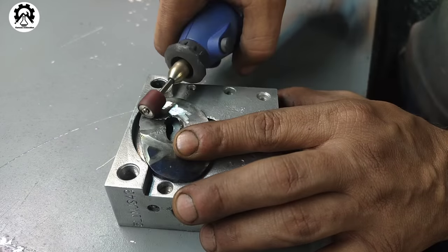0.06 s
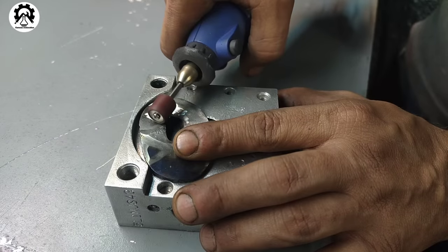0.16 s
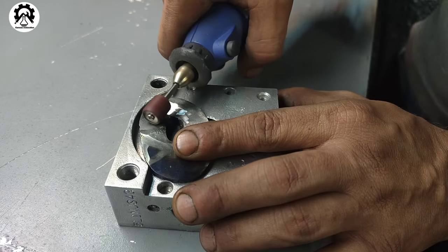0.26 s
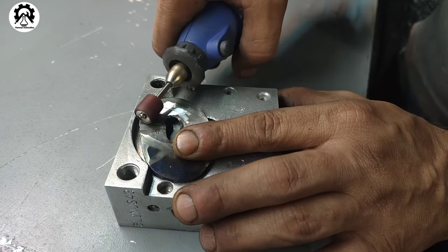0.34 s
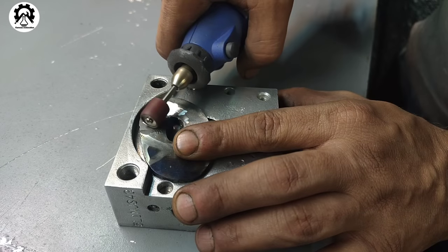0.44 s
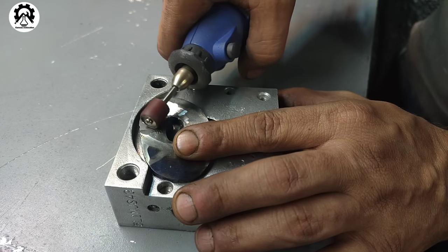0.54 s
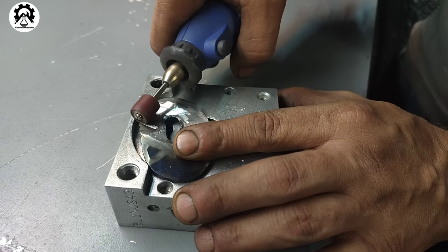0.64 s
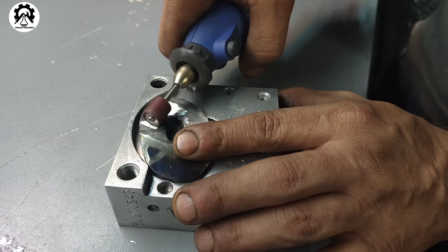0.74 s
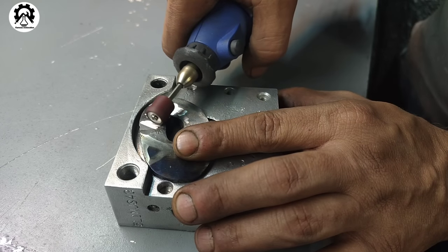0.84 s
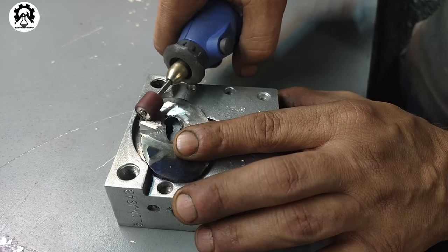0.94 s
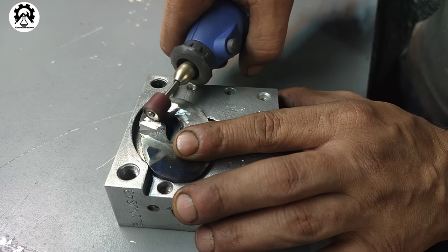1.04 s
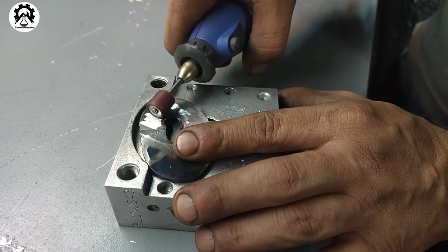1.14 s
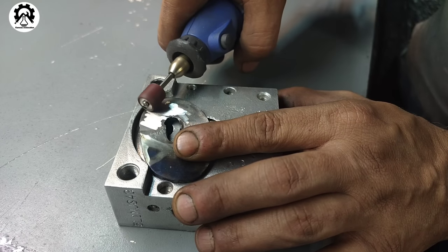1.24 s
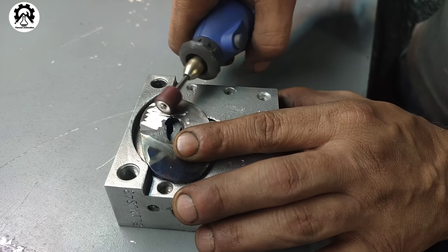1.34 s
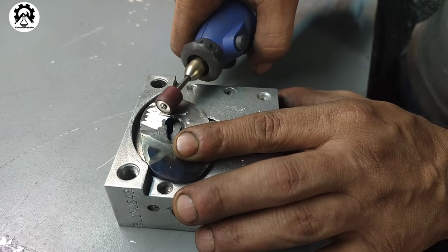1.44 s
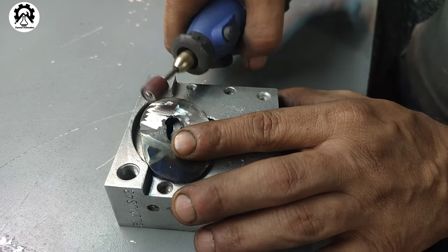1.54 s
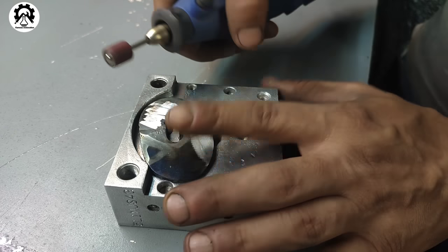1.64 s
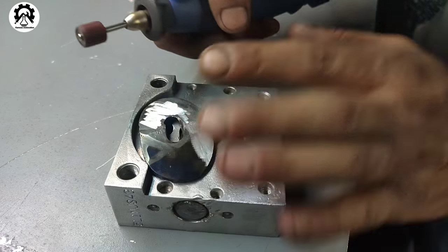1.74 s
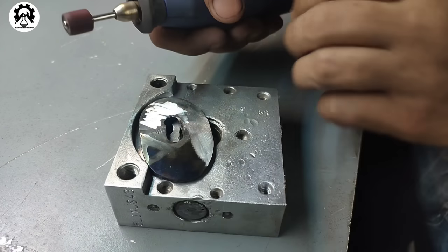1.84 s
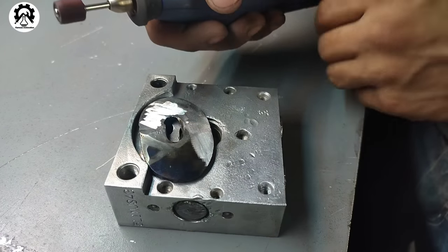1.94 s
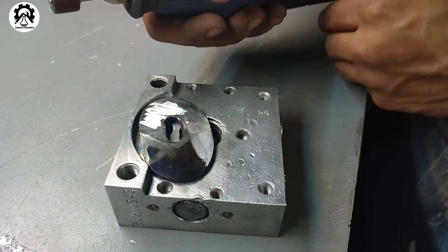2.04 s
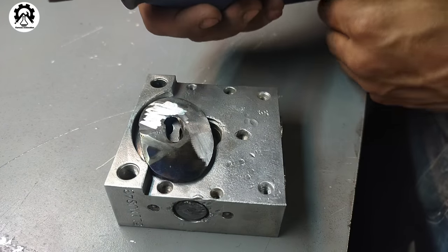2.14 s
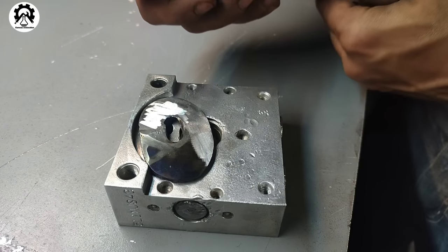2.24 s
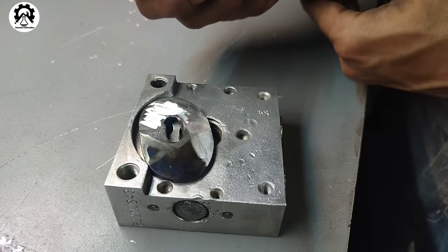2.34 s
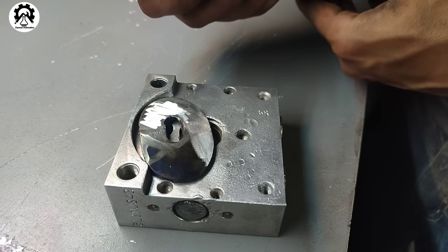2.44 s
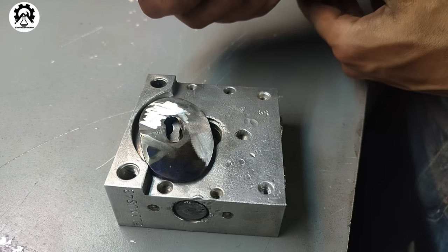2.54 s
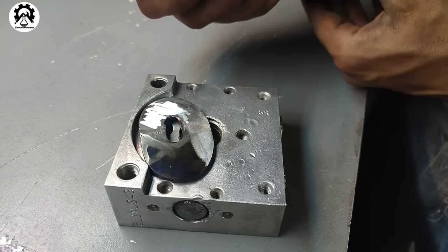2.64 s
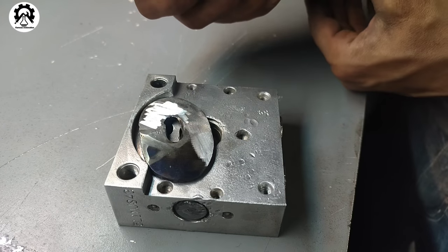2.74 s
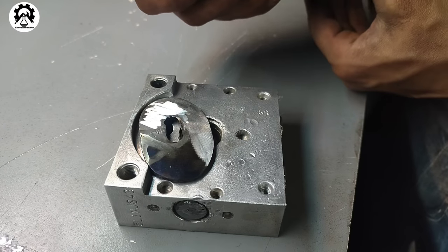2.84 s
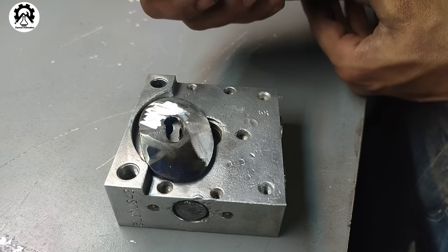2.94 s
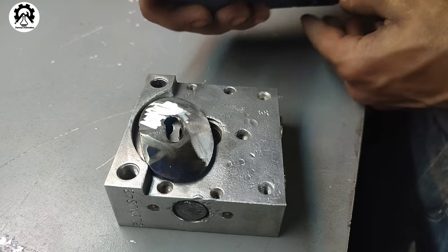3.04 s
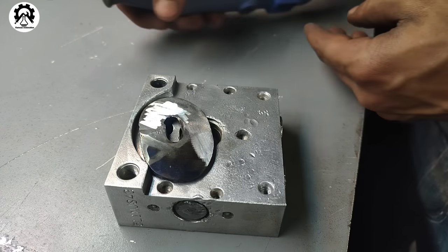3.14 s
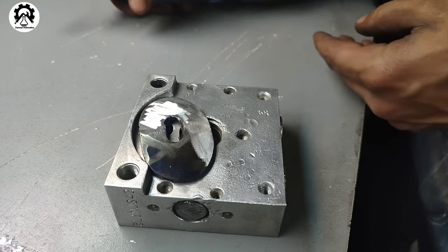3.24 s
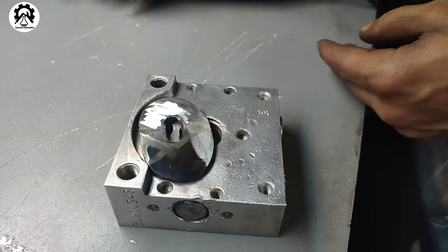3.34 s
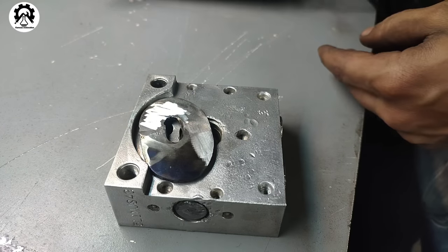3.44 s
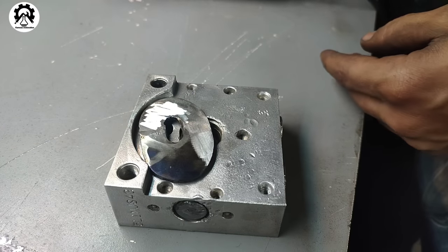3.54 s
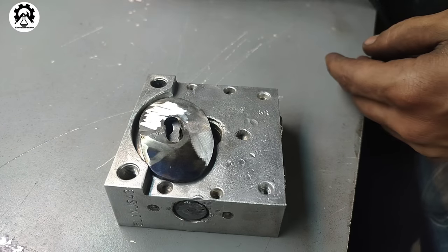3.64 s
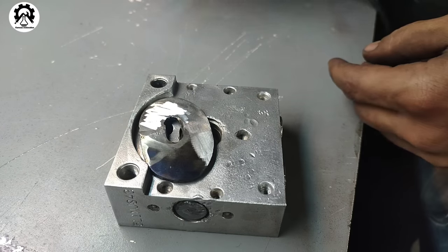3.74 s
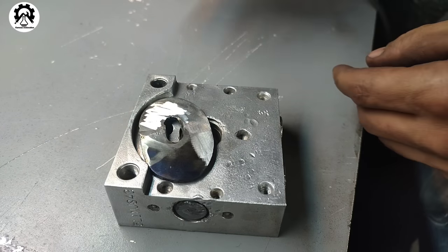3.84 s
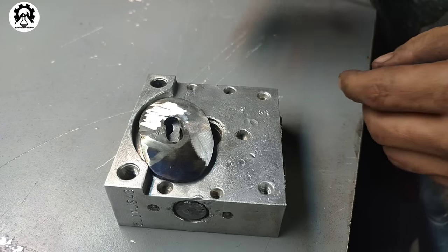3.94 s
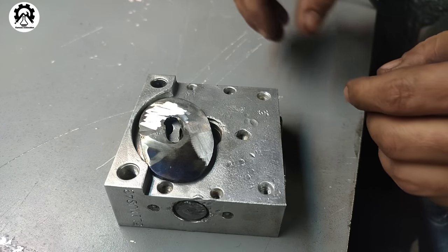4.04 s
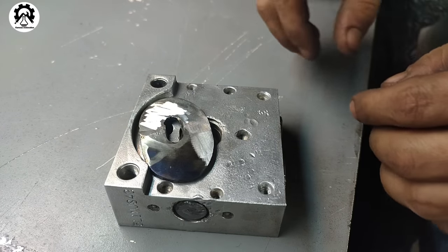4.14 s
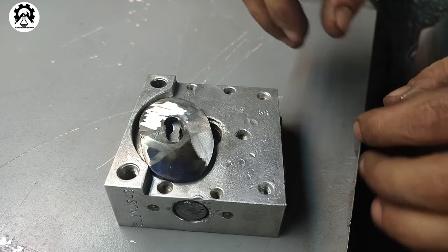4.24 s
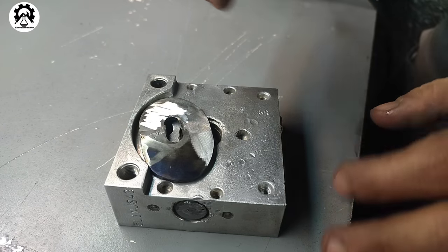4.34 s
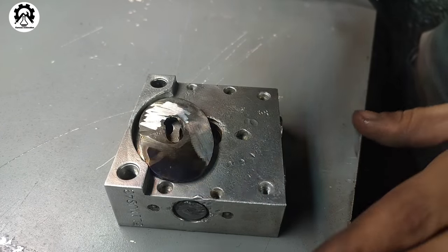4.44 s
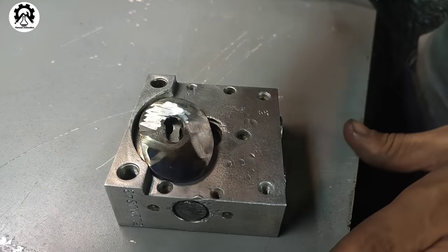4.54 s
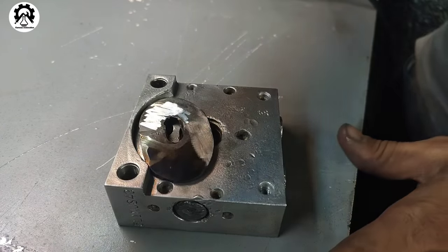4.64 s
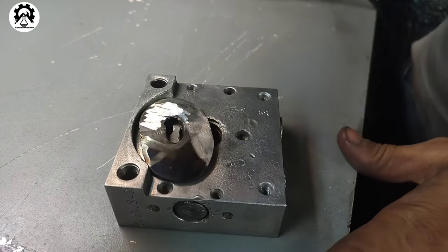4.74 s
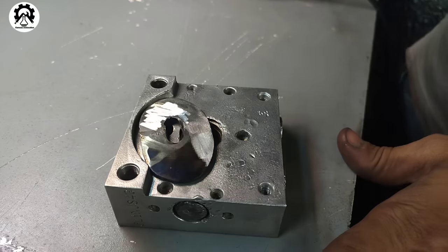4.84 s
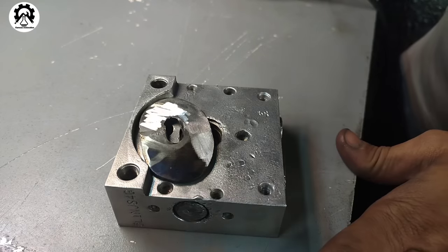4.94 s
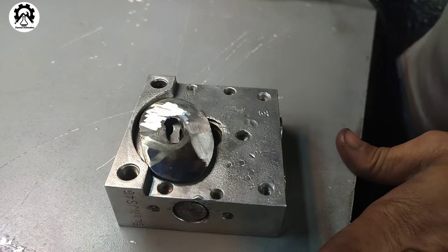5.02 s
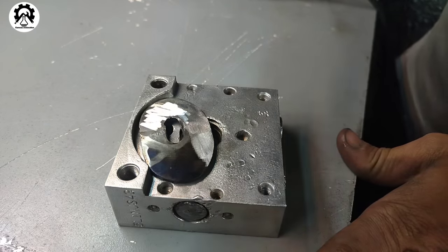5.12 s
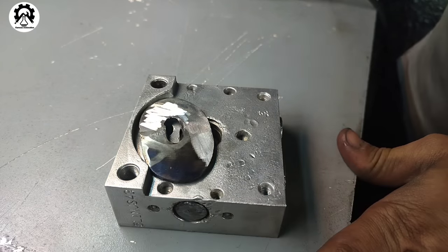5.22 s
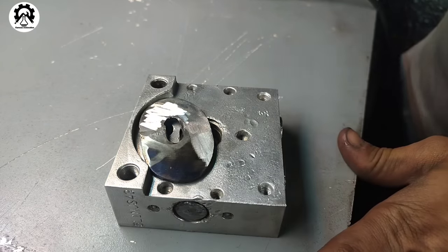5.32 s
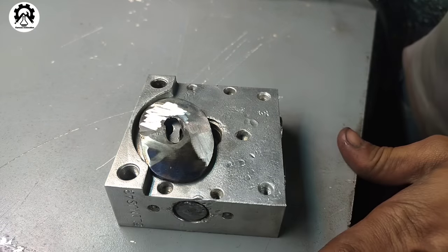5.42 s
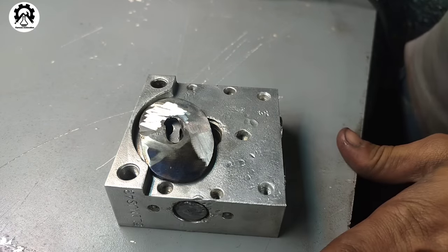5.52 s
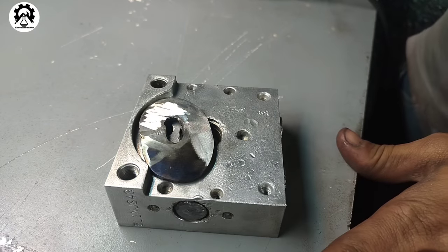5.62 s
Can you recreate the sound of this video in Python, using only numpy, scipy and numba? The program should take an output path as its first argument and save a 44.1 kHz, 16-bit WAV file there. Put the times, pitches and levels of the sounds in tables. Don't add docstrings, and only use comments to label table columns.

```python
import sys
import numpy as np
from scipy import signal
from scipy.fft import rfft, irfft
from scipy.io import wavfile
from scipy.ndimage import uniform_filter1d, map_coordinates
from numba import njit

SR = 44100
rng = np.random.default_rng(int(sys.argv[2]) if len(sys.argv) > 2 else 0)


def ratio(d):
    e = np.asarray(d, float) / 20
    return 10 ** e


def wav_record(signal):
    frames = np.transpose(np.atleast_2d(signal))
    bounded = np.clip(frames, -1, 1)
    quanta = np.round(bounded * 32767).astype(np.int16)
    wavfile.write(sys.argv[1], SR, quanta)


N = 250488
T = np.arange(N) / SR
LIFT_S, SWITCH_OFF_S, LAID_DOWN_S, STILL_S = 1.77, 2.972, 3.62, 4.65
CAGE = .388
MAINS_HZ = 100
FRAMES = dict(fs=SR, nperseg=1024, noverlap=768)

# time_s, turns_per_s
LOADED_SPEED = [
    (0.0, 250.6),
    (0.17, 248.4),
    (0.95, 249.3),
    (1.3, 248.6),
    (1.45, 242.9),
    (1.62, 239.2),
    (1.77, 238.0),
]
# time_s, turns_per_s
COAST_SPEED = [
    (2.975, 294.2),
    (3.15, 262.6),
    (3.3, 234),
    (3.6, 180.3),
    (4.0, 110.8),
    (4.3, 63.6),
    (4.7, 8.0),
]


def shaft_speed():
    free_turns, lift_turns, spin_up_s = 315.4, 240.3, .945
    free = free_turns - (free_turns - lift_turns) * np.exp(-(T - LIFT_S) / spin_up_s)
    loaded, coasting = curves(LOADED_SPEED)[0], curves(COAST_SPEED)[0]
    return np.select([T < LIFT_S, T < COAST_SPEED[0][0]], [loaded, free], coasting)


# time_s, level_db, left_right_db
HISS_LEVEL = [(0.0, -30.5, -1.5), (0.09, -34, 0), (1.1, -33, -0.5), (1.76, -34.5, -0.5), (1.84, -35.5, -1),
              (2.09, -35.5, 1), (2.7, -35.5, -1.5), (2.91, -33.5, 1.5), (3.65, -35.5, -0.5),
              (3.97, -37, -1.5), (4.38, -46.5, 1), (4.5, -60.5, 1.5), (4.6, -81, 4), (4.65, -102, 2)]
# time_s, state
TOOL_STATE = [(0, 0), (1.72, 0), (1.84, 1), (2.95, 1), (3.05, 2), (3.24, 2), (3.4, 3), (3.6, 3), (4.0, 4),
              (4.4, 5), (4.58, 6)]
# frequency_hz, level_db_per_hz
FAST_COLOURS = [
    [(90, -26.5), (300, -34.5), (637, -25.5), (976, -14.5), (1450, -11), (2460, -7.5), (2950, -14),
     (3230, -6.5), (3800, -8.5), (5460, -18.5), (7300, -4), (8730, -11.5), (10200, -12), (14000, -9.5)],
    [(90, -36.5), (300, -32), (602, -25.5), (1100, 0), (1880, -8.5), (2350, 1), (3010, -7.5), (4390, -6.5),
     (5950, -8), (7580, -4), (9230, -4.5), (10300, -8), (13500, -4.5), (14300, -19.5)],
    [(90, -42), (350, -37.5), (854, -13), (1100, 1), (1410, -7), (1640, -8), (2060, -10.5), (2390, -6),
     (3950, -3.5), (5680, -7), (7930, -2.5), (10400, -6.5), (13700, -5), (14300, -14)],
]
# frequency_hz, level_db_per_hz
TURNED_COLOUR = [(150, -47.5), (300, -34), (600, -31.5), (900, -16), (1290, -12.5), (1560, -1),
                 (1910, -14.5), (2380, -8.5), (3200, -11.5), (4000, -4), (5640, -8.5), (7910, -4.5),
                 (10400, -12), (14300, -5)]
# frequency_hz, level_db_per_hz
SLOW_COLOURS = [
    [(530, -71), (900, -43.5), (1220, -20), (1640, -15), (1910, -24), (2450, -8), (2900, -8), (3610, -12),
     (4010, -7), (5510, -9.5), (7320, -5), (13800, -23), (14500, -8.5), (15000, -46.5)],
    [(350, -62), (600, -36), (899, -39), (1130, -6.5), (1240, -14), (1650, -11), (2070, -16), (2600, 0),
     (5390, -9), (6690, -2.5), (10500, -22), (12300, -24), (14400, -35), (15000, -71)],
    [(500, -40), (1070, -6.5), (1900, -15), (2350, -3), (2600, 9), (2900, -4), (5590, -15), (7230, -9),
     (10000, -30), (13000, -36)],
]
# time_s, level_db
FAN_ROAR = [(1.74, 0), (1.79, -5), (1.95, -2.5), (2.3, 0), (2.6, 0.5), (3.1, 0.5), (3.3, -3)]


def tool(turns, speed):
    level_db, pan_db = curves(HISS_LEVEL)
    powered = T < SWITCH_OFF_S
    beat = 1 + 0.058 * np.cos(2 * np.pi * turns)
    beat += 0.056 * powered * np.cos(2 * np.pi * MAINS_HZ * T)
    hz, t, hiss = signal.stft(pair() * beat, **FRAMES)
    lines = signal.stft(bearing_lines(turns, speed), **FRAMES)[2]
    row = hz[:, None]

    ridges = evened(uniform_filter1d(rng.standard_normal((400, len(t))), 28, 1))
    place = row / (CAGE * 1.2 * np.maximum(np.interp(t, T, speed), 45))
    forest = map_coordinates(ridges, [place, np.arange(len(t)) + 0 * place], order=1, mode="wrap")
    bright = np.clip(row / 1500, 0, 1) ** 2
    forest_depth = np.interp(t, [2.9, 3.3, 3.7, 4.0], [0.96, 0.81, 1.1, .65])
    hiss = hiss * ratio((5.13 * forest - 2.0) * bright * forest_depth)

    treble = (hz > 3000) & (hz < 14000)
    shapes = np.array([read(c, hz) for c in FAST_COLOURS + [TURNED_COLOUR] + SLOW_COLOURS])
    shapes -= 10 * np.log10((ratio(shapes) ** 2 * treble).mean(1))[:, None]
    distance = abs(curves(TOOL_STATE, t)[0] - np.arange(len(shapes))[:, None])
    colour_db = shapes.T @ np.maximum(1 - distance, 0)
    patches = uniform_filter1d(rng.standard_normal(hiss.shape), 10, 1)
    patches = evened(uniform_filter1d(patches, 30, 2))
    z = (hiss + lines) * ratio(colour_db + 2.08 * patches * bright)

    below_top = 1 + (row / 1470) ** 6
    above_bottom = 1 + (650 / (row + 1)) ** 4
    z *= ratio(curves(FAN_ROAR, t)[0] / below_top / above_bottom)
    x = signal.istft(z, **FRAMES)[1][:, :N]
    return panned(x * ratio(level_db + 1.04) * (T < STILL_S), pan_db) + switch_snap()


def switch_snap():
    after = np.maximum(T - SWITCH_OFF_S, 0)
    return ratio(-33 - 60 * after / 0.027) * (after > 0) * rng.standard_normal((2, N))


# grinding_db, free_db, coasting_db
SHAFT_LINES = [(29, 7.5, -7), (19, -3.5, -20.5), (11.5, -18.5, -9), (13, -16, -8.5), (11.5, 6.5, -17.5),
               (16, -6, -24.5), (16, 3.5, -20.5), (6, 10, 7), (-17.5, 4.5, -13), (7.5, -7, -14.5),
               (-12.5, -9, -14), (17.5, 5, 2), (-18.5, 9.5, -16.5), (9, 4, -27), (-2.5, -4, -2.5),
               (-4, -19.5, -3.5), (-9.5, -2, -12.5), (5.5, 9.5, -12.5), (2.5, 8.5, -6), (1, -7, -8),
               (-15.5, -8.5, -17), (8.5, -24, -22.5)]
PASS_ORDERS = [(1, 0), (1, 1), (2, 1), (3, -1), (3, 0), (3, 1), (4, -1), (4, 0), (4, 1), (5, -1), (5, 0),
               (5, 1), (6, 1), (7, -1), (7, 0), (7, 1), (8, 0), (12, 5), (9, -1), (9, 0), (9, 1), (10, 1),
               (11, 1), (2, 0), (6, 0), (9, -2), (10, 0), (11, 0)]
# grinding_db, free_db, coasting_db
PASS_LINES = [(5.5, 8, 5), (6.5, -10.5, -3), (-12, -6.5, -3), (6.5, 10.5, 0), (5, 8, 6), (9, 13.5, 5),
              (9, 12, 4), (6, 11, 9), (2, 12, 7), (-0.5, 10, 5), (15, 8, 4), (12, 6, 4), (7, 11, -1),
              (5, 1, 2), (1.5, 3.5, 4), (11, 4, -2), (7, 13.5, 4), (5, 9, 4), (17, 4, -1), (14.5, 13, 9.5),
              (-8, 3, 1), (-3, 3, -3), (-4.5, 4.5, -12), (-15, -5, 7), (-15, -5, 3), (-15, -10, 2),
              (3, -10, 5), (-15, 7, 3)]
# grinding_db, free_db, coasting_db
SPIN_LINES = [(-19.5, 4.5, -8.5), (-1, -8, -20), (-12.5, 10.5, 5), (-18.5, -12, -15), (-5, 11, -3.5),
              (13.5, -4, -14), (11, 0.5, 10), (13.5, 1, -2), (1, 3.5, -17.5), (3.5, 13.5, -14.5),
              (-5, -1.5, -9), (4, -2, -7), (4, 0.5, 16.5), (3.5, -6.5, -7), (-6, -6, -9.5),
              (-2.5, 9.5, 0.5), (0.5, -4, -22.5), (-0.5, 4, -16), (-6.5, -7, -21.5), (-12.5, -5.5, -7)]


def bearing_lines(turns, speed):
    ball_pass, ball_spin = 3.888, 2.68
    orders = [k + 1 for k in range(len(SHAFT_LINES))]
    orders += [ball_pass * k + CAGE * side for k, side in PASS_ORDERS]
    orders += [ball_spin * (k + 1) for k in range(len(SPIN_LINES))]
    orders = np.array(orders)
    step = 512
    at = np.minimum(np.arange(N // step + 2) * step, N - 1)
    t = T[at]
    chance = rng.standard_normal((len(orders), 2, len(at), 2))
    waver = evened(uniform_filter1d(chance[..., 0], 6, 2))
    slip = evened(uniform_filter1d(chance[..., 1], 5, 2))

    state = curves(TOOL_STATE, t)[0]
    heights = np.add(SHAFT_LINES + PASS_LINES + SPIN_LINES, [.1, -1.5, 1.5])
    level_db = []
    for order, (grinding, free, coasting) in zip(orders, heights):
        slow = coasting + (-12 if int(order > 17) else 2)
        blurred = coasting - 5
        stages = [grinding, free, blurred, coasting - 1.5, slow, slow, coasting]
        level_db.append(np.interp(state, [0, 1, 2, 3, 4, 4.7, 5], stages))
    level_db = np.array(level_db)
    level_db[0] += np.interp(t, [1.48, 1.58, 1.75], [0, -9, -3])
    turning = evened(uniform_filter1d(chance[:, 0, :, 0], 18, 1))
    level_db += 2.5 * np.minimum(turning, 1) * (t > LIFT_S)

    heard = (orders[:, None] * speed[at] < SR / 2.5) & (t < STILL_S)
    waver_db = np.where(t < LIFT_S, 2.4, 3.65) * np.minimum(waver, 1.3)
    hiss_in_line = np.sqrt(2 * 32 / (SR / 2))
    gain = hiss_in_line * ratio(level_db[:, None] + waver_db) * heard[:, None]
    phase = 0.0067 * orders[:, None, None] * slip[:, :1]
    phase = phase + 1.12 * np.clip(orders / 3.3, .35, 1)[:, None, None] * slip
    return sing(turns, orders, gain, phase, step)


@njit
def sing(turns, orders, gain, phase, step):
    out = np.zeros((2, len(turns)))
    for k in range(len(orders)):
        for c in range(2):
            for n in range(len(turns)):
                j, u = n // step, n % step / step
                g = gain[k, c, j] * (1 - u) + gain[k, c, j + 1] * u
                if g > 0:
                    p = phase[k, c, j] * (1 - u) + phase[k, c, j + 1] * u
                    out[c, n] += g * np.sin(2 * np.pi * orders[k] * turns[n] + p)
    return out


# time_s, level_db
WHINE_LEVEL = [(0.0, -48), (1.2, -47), (1.45, -44), (1.76, -58), (1.9, -39.5), (2.05, -37.5), (2.2, -31),
               (2.39, -26), (2.61, -30), (2.77, -27), (2.96, -33)]
# frequency_hz, width_hz, level_db
CASING_MODES = [(2414, 410, 1.5), (2460, 69, -14.5), (1980, 220, -22)]
# time_s, pitch_ratio
GRIP_SHIFT = [(1.85, 0.96), (2.15, 0.94), (2.4, 0.986), (2.95, 0.999)]


def whine(turns):
    slots = 8
    level_db = curves(WHINE_LEVEL)[0] + 2.5 * drift(1, 4.34) * (T < LIFT_S)
    cycle = (MAINS_HZ * T - .1) % 1
    current = np.exp(-((cycle - .3) / 0.068) ** 2) * ratio(0.7 * drift(1, 50))
    pull = current * np.cos(2 * np.pi * slots * turns + 0.15 * drift(2, 8)) * (T < SWITCH_OFF_S)
    shift = curves(GRIP_SHIFT)[0]
    ring = np.zeros((2, N))
    for hz, width, db in CASING_MODES:
        soft = resonate(resonate(pull, hz * shift, 400), hz * shift, 400)
        ring += ratio(db) * resonate(soft, hz * shift, width)
    ring[1] = np.roll(ring[1], -5)
    power = uniform_filter1d(ring ** 2, 4000) + 1e-4
    fade_db = 900 * np.maximum(T - SWITCH_OFF_S, 0)
    return panned(ring / np.sqrt(power) * ratio(level_db - fade_db), np.full(N, -3.0))


# start_s, level_db, held_s
GRIND_STROKES = [
    (0.0, -44.5, 0.031),
    (0.25, -59, 0.008),
    (0.574, -52.5, 0.014),
    (0.89, -54, 0.029),
    (1.204, -51, 0.029),
    (1.52, -41, 0.041),
    (1.6, -48.5, 0.11),
    (1.78, -56.5, 0.078),
]
# frequency_hz, level_db_per_hz
PART_COLOUR = [(40, -39.5), (100, -14.5), (232, -14), (354, -10.5), (450, -2.5), (600, -6), (720, -7.5),
               (840, -6.5), (1100, -4.5), (2360, -5.5), (2900, -12.5), (3250, -18), (3900, -23.5),
               (5200, -48.5), (8800, -90.5)]
# start_s, level_db, held_s
DRUM_BOUNCES = [
    (1.506, -44, .01),
    (1.522, -36, .012),
    (1.538, -33.5, .012),
    (1.552, -30, .006),
    (1.598, -37, .012),
    (1.635, -46, .13),
]
# frequency_hz, width_hz, level_db
BOUNCE_MODES = [(120.5, 15, -12.5), (347.4, 92, -6), (600, 62, -5.5), (858, 150, -2), (1160, 89.5, -1),
                (1446, 110, -12.5), (1570, 160, -12.5), (2380, 247, -25.5)]
# start_s, level_db, held_s
LAST_RUB = [(1.635, -41, .135)]
# frequency_hz, width_hz, level_db
RUB_MODES = [(1230, 140, -5.5), (1386, 110, 6), (1590, 150, 1), (1880, 103, -0.5), (2420, 170, -13.5)]


def contact(turns):
    bite, leave, bounce_rate = 599.5, 219, 502
    uneven = rng.standard_normal((2, N))
    lands = np.diff(np.floor(turns / 2 + .4), prepend=0) * ratio(1.5 * uneven)
    rubs = np.diff(np.floor(turns), prepend=0) * ratio(4.5 * uneven)
    scrape = pair() * (1 + 0.39 * np.cos(2 * np.pi * turns))
    grit = ratio(bursts(GRIND_STROKES, bite, leave) + 9.5) * evened(coloured(scrape, PART_COLOUR))
    force = ratio(bursts(DRUM_BOUNCES, bounce_rate, bounce_rate))
    bounce = rung(lands * force, BOUNCE_MODES) * np.sqrt(np.mean(force ** 2))
    rub = rung(rubs, RUB_MODES) * ratio(bursts(LAST_RUB, bite, bite))
    return grit + panned(bounce, np.full(N, 1.5)) + rub


def rung(clicks, modes):
    lag_s = .0005
    out = 0
    for k, (hz, width, db) in enumerate(modes):
        ring = ratio(db) * resonate(resonate(clicks, hz, 3 * width), hz, width)
        out = out + np.roll(ring, round(k * lag_s * SR), axis=1)
    return evened(out)


# time_s, centre_hz, width_hz, depth_db
BAND_NOTCH = [(0.05, 3200, 200, 0), (0.1, 3200, 380, -30), (0.2, 3150, 300, -30), (0.23, 3150, 150, -10),
              (0.27, 3200, 360, -30), (0.4, 3230, 260, -30), (1.35, 3200, 260, -30),
              (1.47, 3250, 240, -30), (1.53, 3500, 170, -25), (1.62, 3350, 240, -30),
              (1.73, 3100, 400, -32), (1.81, 3200, 300, -30), (1.84, 3150, 150, -12),
              (1.93, 3250, 230, -28), (2.0, 3250, 200, 0)]
# frequency_hz, left_right_db
WORK_LEAN = [(60, 0.5), (130, 2.5), (290, 15), (640, 2), (1410, 4.5), (3100, -2.5), (6820, 2.0),
             (15000, 1.5)]


def over_bench(x):
    hz, t, z = signal.stft(x, **FRAMES)
    centre, width, depth_db = curves(BAND_NOTCH, t)
    sway = [np.interp(t, T, d) for d in drift(2, 14.23)]
    width = width * (1 + .15 * np.clip(sway[0], -2, 2))
    offset = (hz[:, None] - centre - 35 * sway[1]) / width
    notch_db = depth_db * np.exp(-offset ** 4)
    lean_db = read(WORK_LEAN, hz)[:, None] * np.interp(t, [1.6, 1.9], [1, 0])
    return signal.istft(panned(z * ratio(notch_db), lean_db), **FRAMES)[1][:, :N]


# start_s, peak_db, brightness_hz
LAYING_KNOCKS = [
    (3.62, -27, 905),
    (3.65, -20.5, 895),
    (3.679, -28.5, 910),
    (3.7, -23, 895),
    (3.743, -40, 900),
    (3.933, -38.5, 895),
    (3.945, -32, 895),
    (3.99, -43.5, 900),
    (4.02, -48, 900),
    (4.085, -49, 900),
]
# pitch_hz, level_db, decay_t60_s
BENCH_MODES = [(42.5, -4.5, 0.46), (103, -7, 0.67), (145, -18, 0.3), (220.5, 3, 0.19), (316, 1.5, 1.8),
               (426, 10, 0.12), (434, -6, 0.84), (494, -21, 0.33), (800, -5, 0.89), (853, -4.5, 0.15),
               (937, 0.5, 0.12), (1043, 0.5, 0.3), (1260, -25, 0.22), (1250, -17, 0.0696),
               (1417, -31, 0.37), (1503, -28.5, 0.3)]
# start_s, level_db, held_s
BENCH_JOLTS = [
    (3.628, -36, .012),
    (3.66, -34, .01),
    (3.682, -32, 0.009),
    (3.74, -33.5, 0.035),
    (3.82, -36, 0.04),
    (3.943, -35, 0.0054),
    (4.02, -39, 0.0067),
    (4.33, -52, .01),
    (4.6, -64.5, .01),
    (4.85, -78, .03),
]
# frequency_hz, level_db_per_hz
SHAKE_COLOUR = [(35, -21.5), (80, -1.5), (151, -6.5), (184, -7), (236, -2.5), (310, -16), (363, -1.5),
                (646, -17.5), (861, -21), (1180, -24.5), (1370, -21.5), (1990, -22), (2500, -15.5),
                (3250, -30), (5500, -120)]


def bench():
    t, blows = T[:SR // 2], np.zeros(N)
    for s, db, hz in LAYING_KNOCKS:
        push = t[:400] * hz
        blows[round(s * SR):][:400] += ratio(db) * (1 - push) * np.exp(-push) * hz / 900
    sides = rng.uniform(0.51, 1, (len(BENCH_MODES), 2, 1))
    ring = np.zeros((2, len(t)))
    for side, (hz, db, t60) in zip(sides, BENCH_MODES):
        damped_t60 = min(0.46 * t60, .3)
        ring += side * ratio(db - 60 * t / damped_t60) * np.sin(2 * np.pi * hz * t)
    struck = signal.oaconvolve(blows[None], ring, axes=1)[:, :N]

    jolt, settle, upper_settle, upper_loss = 448, 85, 262, 85.5
    noise = coloured(pair(size=4096), SHAKE_COLOUR)
    low = coloured(noise, [(260, 0.5), (340, -16.5)])
    low_db = bursts(BENCH_JOLTS, jolt, settle) - 4.0
    upper_db = bursts(BENCH_JOLTS, jolt, upper_settle) + 8 - upper_loss * (T - LAID_DOWN_S)
    shake = evened(low) * ratio(low_db) + evened(noise - low) * ratio(upper_db)
    return panned(ratio(-32.5) * struck + thuds() + shake * (T > LAID_DOWN_S), np.full(N, 1.5))


# start_s, peak_db, pitch_hz, decay_t60_s
PANEL_THUDS = [(3.6216, -17.5, 400, 0.041), (3.634, -28, 210, 0.13), (3.653, -14.5, 402, 0.052),
               (3.662, -19.5, 153, 0.067), (3.672, -21.5, 234.6, 0.14), (3.673, -26, 876, 0.066),
               (3.677, -31, 1364, 0.06), (3.7, -31, 147.2, 0.13), (3.699, -35.5, 439, 0.059),
               (3.724, -30, 278, 0.22), (3.759, -32, 287, 0.34), (3.92, -35, 333, 0.065),
               (3.934, -31, 123, 0.11), (3.942, -39, 875, 0.046), (3.949, -31, 370, 0.077),
               (3.957, -42, 468, 0.089), (3.986, -31, 224, 0.085), (4.001, -34, 142, 0.12),
               (4.016, -34, 250, 0.09)]


def thuds():
    out, t = np.zeros(N), T[:SR // 4]
    onset = 1 - np.exp(-t / 0.0016)
    for s, db, hz, t60 in PANEL_THUDS:
        ring = ratio(db - 60 * t / t60) * onset * np.sin(2 * np.pi * hz * t)
        out[round(s * SR):][:len(t)] += ring
    return ratio(3.0) * out


# start_s, peak_db, pitch_hz, left_right_db
CLOCK_TICKS = [
    (4.789, -57, 9560, -8),
    (5.094, -66, 7700, 3),
    (5.108, -49.5, 7840, 1.5),
    (5.427, -56.5, 9340, 0.5),
]


def clock():
    out, t = np.zeros((2, N)), T[:8000]
    decay = ratio(-60 * t / 0.045) + ratio(-19 - 60 * t / 0.18)
    for s, db, hz, pan_db in CLOCK_TICKS:
        burst = np.zeros((2, N))
        burst[:, round(s * SR):][:, :len(t)] = rng.standard_normal((2, len(t))) * ratio(db) * decay
        ring = ratio(0.5) * resonate(resonate(burst, hz, 1300), hz, 1300)
        click = ratio(-15.5) * coloured(burst, [(500, -18), (2500, 1), (12000, 1.5)])
        out += panned(ring + click, np.full(N, pan_db))
    return out


# frequency_hz, level_db_per_hz
SHOP_COLOUR = [(15, -15.5), (25, -8), (50, 1), (100, -9.5), (200, -20.5), (400, -28.5), (1000, -40.5),
               (4000, -45), (14000, -50.5)]


def shop_rumble():
    return ratio(-68) * evened(coloured(pair(size=4096), SHOP_COLOUR))


# frequency_hz, likeness_0_to_1
PORT_LIKENESS = [(40, 0.9), (150, 0.77), (380, 0.25), (950, 0.87), (2380, 0.18), (5980, 0.049),
                 (15000, 0.14)]


def pair(size=1024):
    hz, t, z = signal.stft(rng.standard_normal((2, N)), SR, nperseg=size)
    same = np.clip(read(PORT_LIKENESS, hz), 0, 1)[:, None]
    z[1] = same * z[0] + np.sqrt(1 - same ** 2) * z[1]
    return signal.istft(z, SR, nperseg=size)[1][:, :N]


def bursts(rows, rise, fall):
    levels = []
    for s, db, held in rows:
        before, after = np.maximum(s - T, 0), np.maximum(T - s - abs(held), 0)
        levels.append(db - rise * before - fall * after)
    return np.max(levels, 0)


def resonate(x, hz, width):
    turn = np.exp(2j * np.pi * np.cumsum(hz + 0 * T) / SR)
    r = np.exp(-np.pi * width / SR)
    return 2 * (turn * signal.lfilter([1 - r], [1, -r], x / turn)).real


def coloured(x, points):
    hz = np.fft.rfftfreq(x.shape[-1], 1 / SR)
    return irfft(rfft(x) * ratio(read(points, hz)), x.shape[-1])


def drift(shape, per_s):
    knots = rng.standard_normal((max(shape, 1), 400))
    place = T * np.clip(per_s, 1, 60)
    return np.array([np.interp(place, np.arange(400), k) for k in knots]).squeeze()


def evened(x):
    return x / np.sqrt(np.mean(x ** 2) + 1e-20)


def panned(x, db):
    return x * ratio(np.array([db / 2, -db / 2]))


def read(points, hz):
    f, value = np.transpose(points)
    return np.interp(np.log(hz + 1), np.log(f + 1), value)


def curves(rows, t=T):
    s, *columns = np.transpose(rows)
    return [np.interp(t, s, c) for c in columns]


def scene():
    speed = shaft_speed()
    turns = np.cumsum(speed * (1 + .0012 * drift(1, 20))) / SR
    work = tool(turns, speed) + whine(turns) + contact(turns)
    return over_bench(work) + bench() + clock() + shop_rumble()


def low_pass(x):
    return signal.sosfilt(signal.butter(12, 15600, fs=SR, output="sos"), x)


def record(dry):
    late = np.array([dry[0], np.roll(dry[1], 6)])
    edge = signal.firwin(301, 14300, window=("kaiser", 8), fs=SR)
    mix = signal.oaconvolve(late, edge[None], "same")
    return low_pass(mix)


dry = scene()
out = record(dry)
wav_record(out)
```